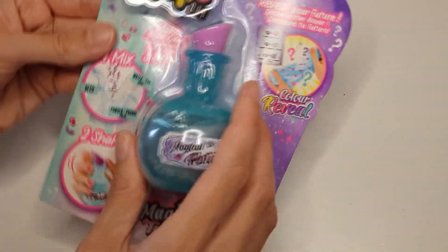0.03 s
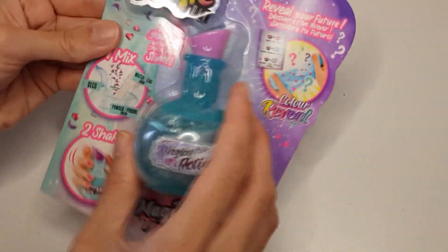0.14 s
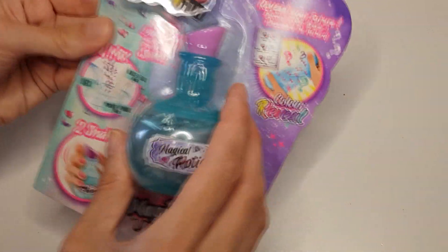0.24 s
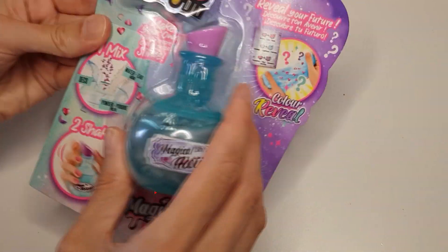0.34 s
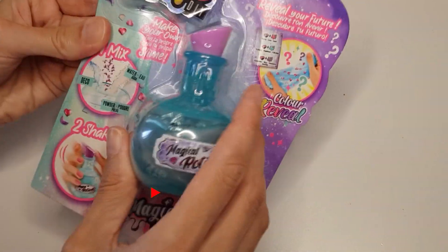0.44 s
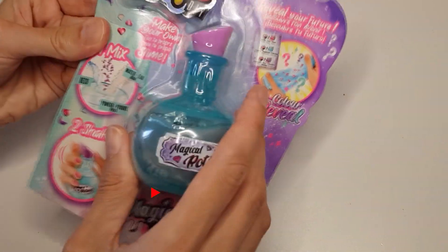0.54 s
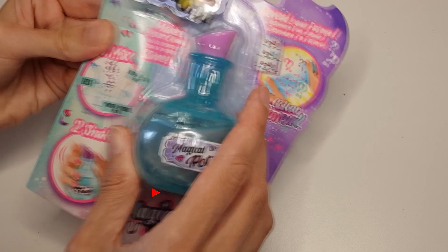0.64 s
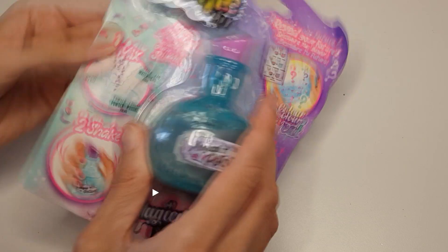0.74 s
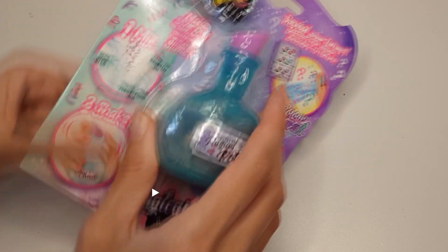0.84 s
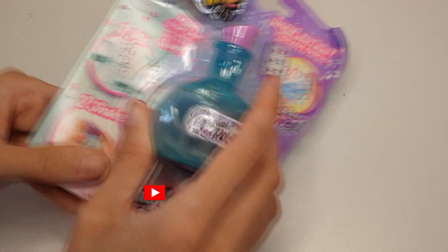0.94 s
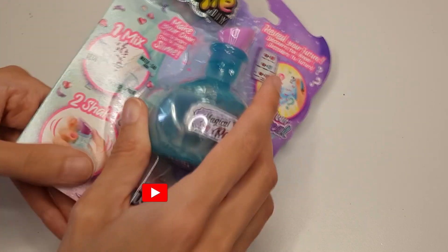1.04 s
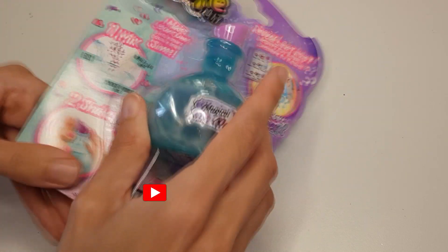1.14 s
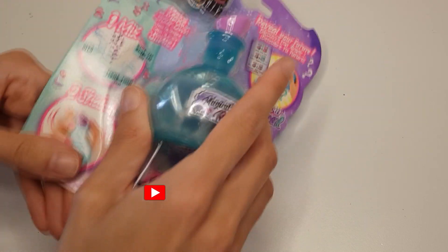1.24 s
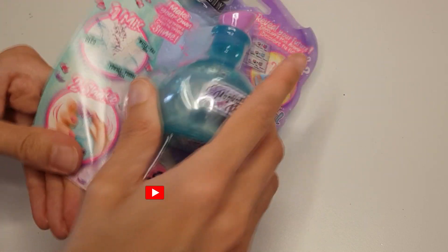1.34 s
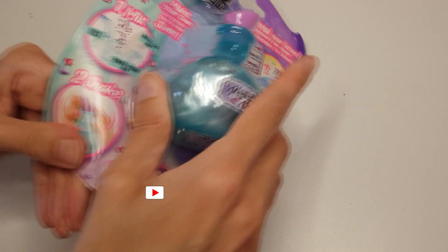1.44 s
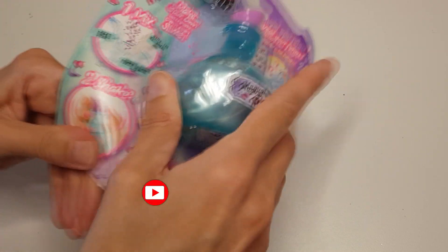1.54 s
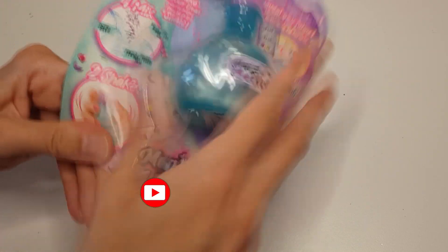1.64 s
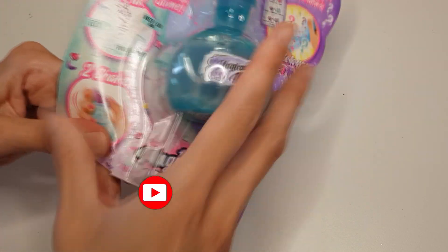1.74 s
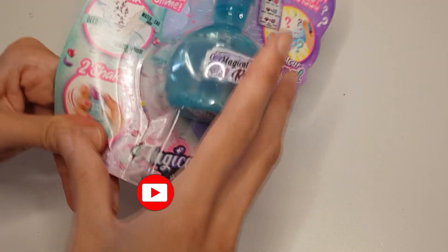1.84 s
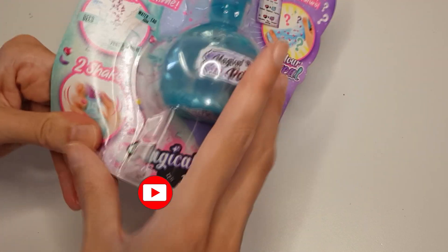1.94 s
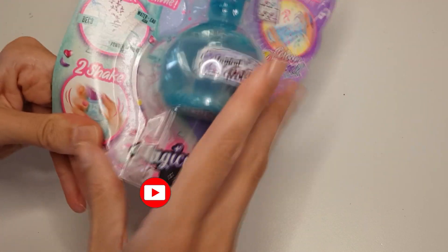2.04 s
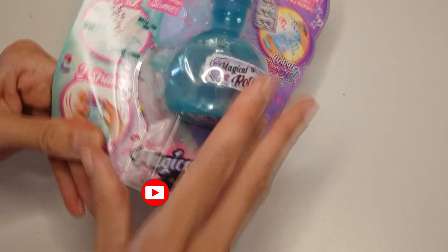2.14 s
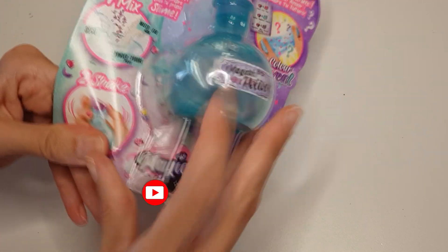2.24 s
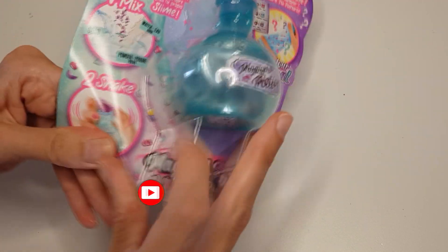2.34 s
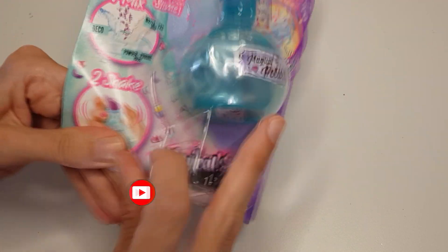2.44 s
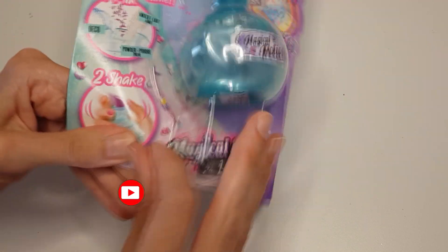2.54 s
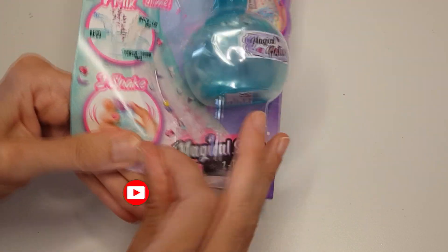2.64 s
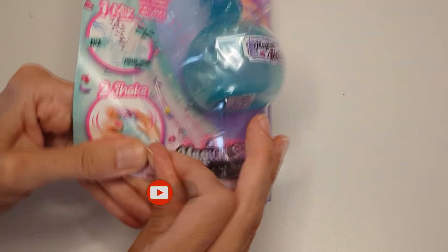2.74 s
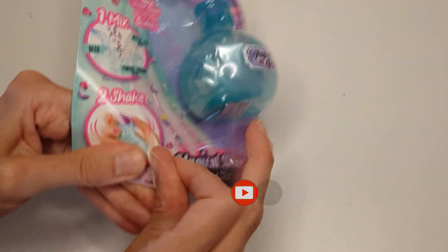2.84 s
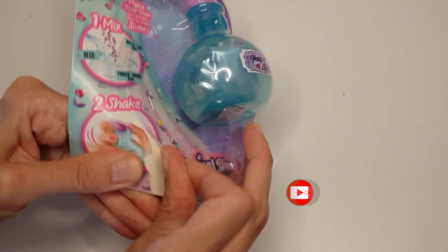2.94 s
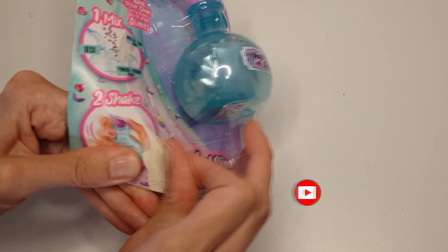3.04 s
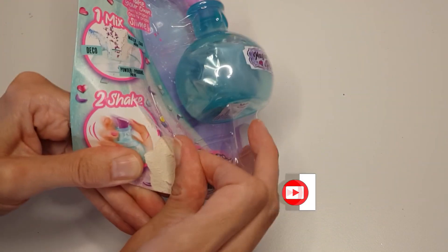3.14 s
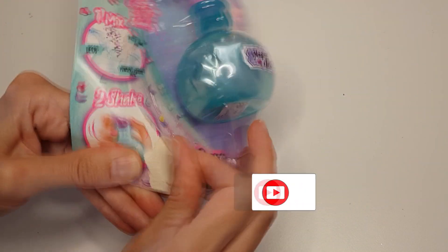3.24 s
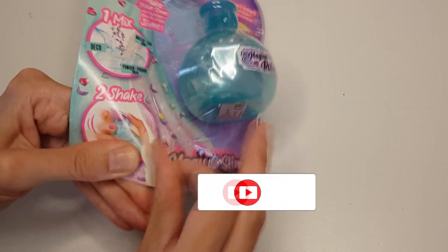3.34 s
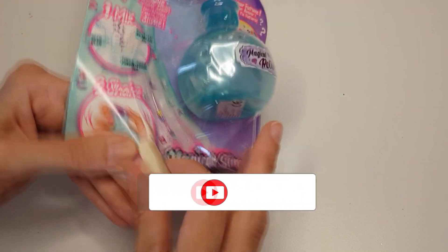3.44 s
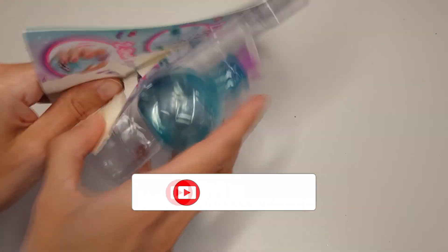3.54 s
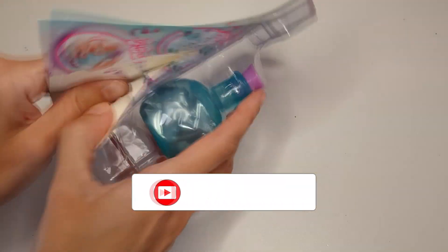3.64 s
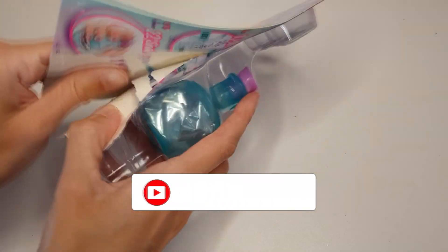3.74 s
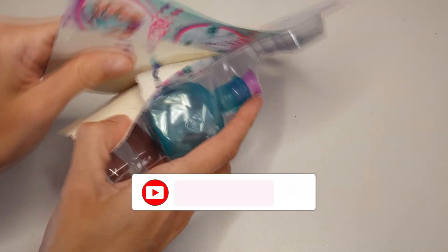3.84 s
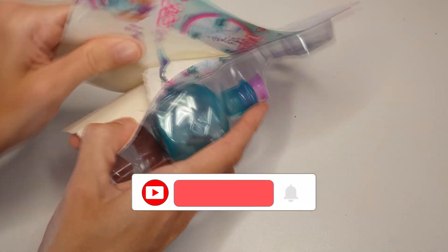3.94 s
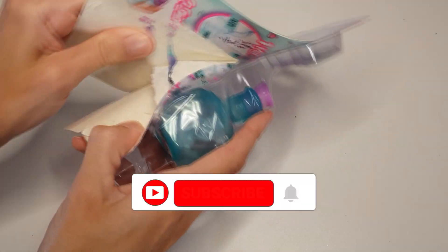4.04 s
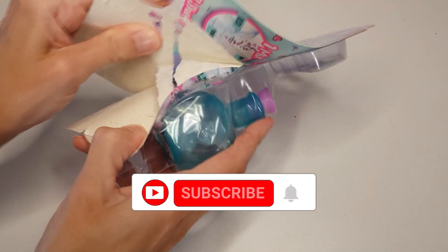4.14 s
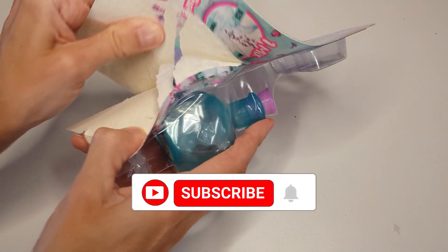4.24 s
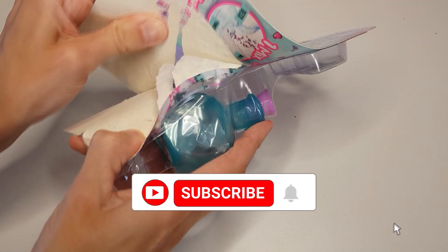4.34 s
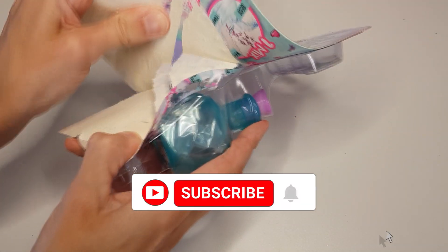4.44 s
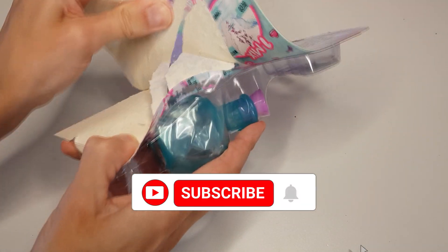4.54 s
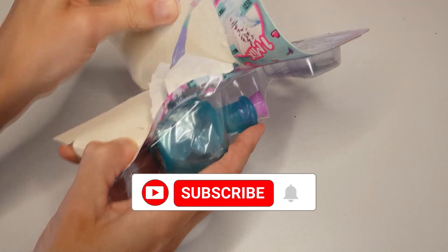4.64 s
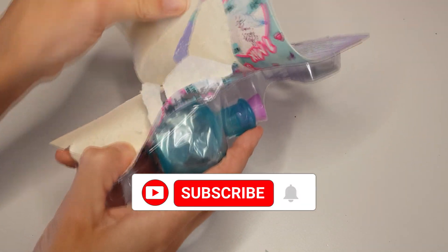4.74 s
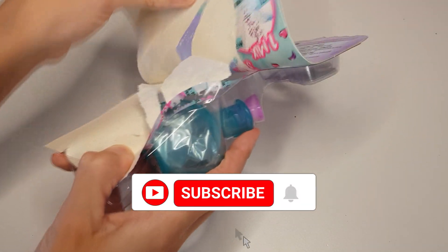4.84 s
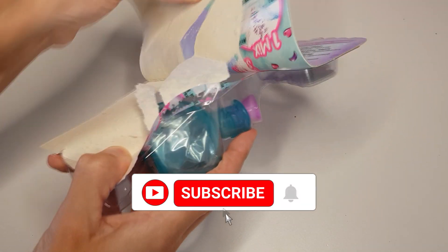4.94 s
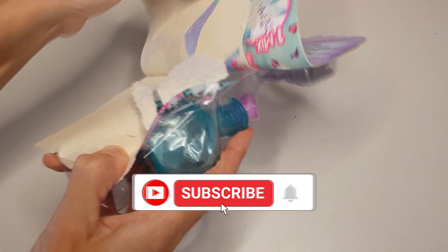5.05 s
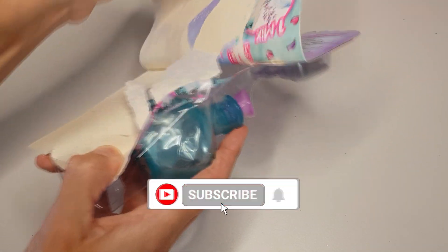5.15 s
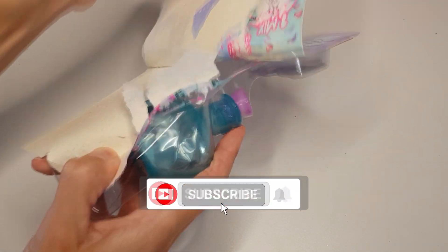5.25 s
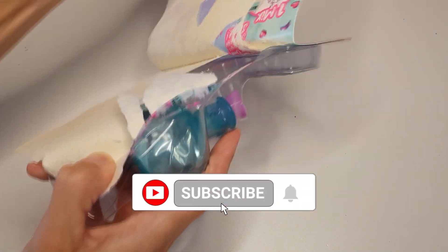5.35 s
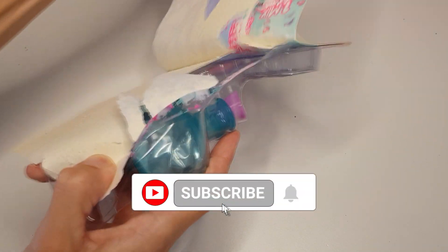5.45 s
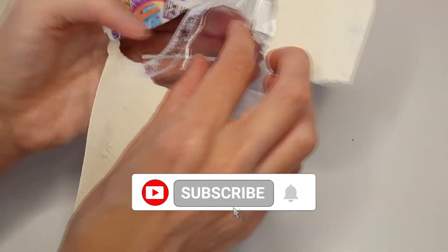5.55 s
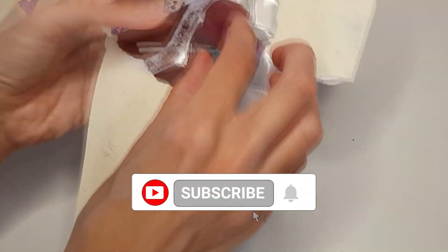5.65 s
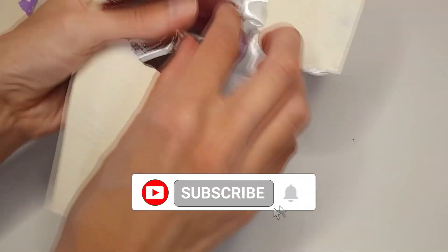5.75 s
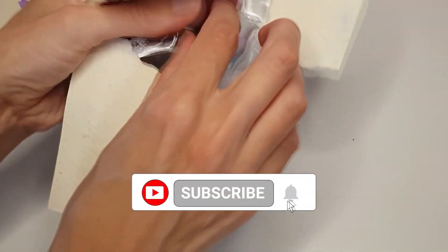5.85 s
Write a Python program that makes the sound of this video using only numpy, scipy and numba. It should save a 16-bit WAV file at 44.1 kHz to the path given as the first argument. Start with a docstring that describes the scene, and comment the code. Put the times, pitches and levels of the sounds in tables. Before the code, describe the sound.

Hands snap open a stiff plastic blister pack with dull pops, then rip off its card backing in one long, crackling tear.

```python
"""Sharp plastic snaps and dull pops, close up in a small room: hands are opening a blister pack over a table.
The stiff shell buckles and its dome flips over, while fingers rub and slide on it. The glued card backing
rips away in a flutter, crackle and fizz of breaking fibres: a few short tugs, then one long tear that
stops abruptly, and a little last handling."""
import sys
import numpy as np
from scipy import signal
from scipy.fft import rfft, irfft, next_fast_len
from scipy.io import wavfile
from scipy.ndimage import uniform_filter1d
from numba import njit

SR = 44100
rng = np.random.default_rng(int(sys.argv[2]) if len(sys.argv) > 2 else 0)


def inscribe(sig):
    """Save sig as 16-bit PCM at rate SR to the path in sys.argv[1].

    A 1-D sig is mono; a 2-D sig holds one channel per row.
    Samples are clipped to [-1, 1] before scaling.
    """
    pcm = np.round(np.clip(np.atleast_2d(sig).T, -1, 1) * 32767)
    wavfile.write(sys.argv[1], SR, pcm.astype(np.int16))


N = 259515
TIME = np.arange(N) / SR

# Tone of the still room. Each row: frequency in Hz, level in dB.
AIR_EQ = [(15, -32), (25, -2), (102, 0), (476, -18), (754, -28), (936, -22), (5280, -28), (8590, -33),
          (13200, -28), (16000, -31)]
# The room's ring. Each row: band centre in Hz, time to fade 60 dB in seconds, level in dB.
ROOM_BANDS = [(342, 0.4, -3), (886, 0.54, -8.5), (1900, 0.46, -9.5), (3480, 0.55, -9), (8000, 0.53, -10),
              (13100, 0.38, -7.5)]
# The pack bumps the table. Each row: start in seconds, level in dB.
TABLE_BUMPS = [(0.738, -49), (1.331, -55.5), (2.875, -46.5), (3.31, -59), (3.579, -57)]
# Resonances of the plastic shell. Each row: pitch in Hz, width in Hz, gain in dB.
SHELL_MODES = [(438, 197, 9), (845, 55, 3), (960, 230, -6.5), (1700, 360, -2), (2280, 33, -2.5),
               (3460, 340, -5), (4000, 190, 0), (4930, 800, -2.5), (11050, 1900, 8)]
# How the card radiates. Each row: frequency in Hz, gain in dB.
CARD_EQ = [(400, -52.5), (720, 2), (1120, -1), (1800, -0.5), (2500, -8.5), (3500, -9), (5000, -10.5),
           (6400, -14.5), (8000, -22), (11300, -11.5), (13500, -16), (15600, -17.5), (16500, -21)]
# The card flap's note moves as the hands bend and free it. Each row: time in seconds, pitch in Hz.
FLAP_PITCH = [(1.34, 1220), (1.59, 2280), (2.85, 1030), (3.27, 980), (3.42, 940), (3.65, 1700),
              (4.11, 1530), (4.22, 1115), (4.5, 1420), (4.82, 1230), (5.14, 1130), (5.37, 1140),
              (5.57, 1700), (5.68, 1180)]
# Fingers tighten on the hollow shell. Each row: start in seconds, length in seconds, level in dB.
FINGER_GRIPS = [(0.948, 0.1, -77), (2.21, 0.15, -73.5), (2.355, 0.07, -63.5), (2.498, 0.041, -68),
                (2.754, 0.073, -69), (2.863, 0.016, -46.5), (3.106, 0.11, -63.5), (3.22, 0.061, -53),
                (3.521, 0.089, -63), (3.796, 0.015, -59.5), (5.614, 0.46, -65.5)]
# Fingertips slide. Each row: start in seconds, length in seconds, level in dB, centre of the hiss in Hz.
FINGER_SLIDES = [(0.947, .07, -72, 5670), (1.093, 0.037, -72, 5500), (1.345, 0.0088, -47, 12500),
                 (1.877, 0.067, -76.5, 6600), (2.015, 0.064, -71.5, 6500), (2.118, 0.11, -72.5, 6400),
                 (2.23, 0.058, -74, 12100), (2.273, 0.17, -75.5, 3730), (2.363, 0.13, -72, 11600),
                 (2.575, 0.37, -64.5, 13200), (3.017, 0.078, -55, 13800), (3.09, 0.01, -53, 4930)]
# Close modes of the dome, beating as it rings on.
# Each row: pitch in Hz, level in dB, time to fade 60 dB in seconds.
DOME_PARTIALS = [(520, -14, 0.32), (651, -9, 0.21), (757, 0, 0.33), (840, -3.5, 0.41), (937, -6, 0.38),
                 (990, -1, 0.34), (1100, -10, 0.25), (1360, -21, 0.23)]
# The dome buckles. Each row: start in seconds, dome pitch in Hz, dome level in dB, rim pitch in Hz,
# rim level in dB, the dome's lag behind the rim in seconds, after-ring level in dB, room send in dB.
DOME_POPS = [(0.7501, 926, -20, 2200, -37.5, .0002, -60, -14),
             (0.7825, 865, -33, 2400, -43, 0.00028, -58, -8),
             (2.8755, 960, -26.5, 3560, -36, 0.00016, -58, -15),
             (2.8816, 906, -25, 3800, -19, 0.00045, -51, -7.5),
             (3.3125, 982, -11, 2635, -20, 0.00096, -38, -5.5)]
# Shell and glue snap. Each row: start in seconds, ring time in seconds, level in dB,
# strongest frequency in Hz, roll-off to either side in dB per octave.
SHELL_SNAPS = [(0.188, 0.0093, -54, 850, 16), (0.6947, 0.0079, -57.5, 600, 5.5),
               (0.7316, 0.004, -40, 940, 5.5), (0.737, 0.0034, -39, 940, 9), (0.7499, 0.004, -33.5, 870, 9),
               (0.934, 0.014, -50.5, 700, 12.5), (0.972, 0.018, -58.5, 900, 10),
               (1.011, 0.014, -51, 845, 10.5), (1.304, 0.0074, -54.5, 595, 12),
               (1.3358, 0.0015, -30, 11000, 12), (1.3367, 0.004, -33.5, 2200, 2),
               (1.511, 0.0069, -59.5, 2300, 6), (1.5861, 0.0025, -39.5, 2660, 7.5),
               (2.233, 0.0023, -64, 11000, 5), (2.323, 0.014, -64.5, 1700, 3),
               (2.39, 0.0079, -64, 900, 1.5), (2.407, 0.0067, -56.5, 11000, 9),
               (2.607, 0.007, -45.5, 12000, 35), (2.623, 0.0021, -39.5, 12000, 36),
               (2.669, .005, -53, 7000, 3.5), (2.7621, 0.003, -51, 11100, 8.5),
               (2.812, 0.0015, -52, 11000, 8), (2.8252, 0.012, -51, 11400, 5),
               (2.8546, 0.005, -41, 686, 13), (2.8652, 0.018, -44, 11000, 4.5),
               (2.882, 0.0042, -31.5, 1900, 8.5), (2.898, 0.0078, -38, 700, 18),
               (3.0176, 0.0036, -52.5, 11000, 3.5), (3.061, 0.008, -43, 11500, 6.5),
               (3.0721, 0.018, -45.5, 8000, 4.5), (3.16, .002, -59, 11000, 6),
               (3.2648, .008, -32.5, 1000, 14), (3.3127, 0.0029, -18, 1210, 16.5),
               (3.3711, 0.0036, -43, 3000, 3.5), (3.572, 0.003, -40.5, 1700, 3.5),
               (3.6123, 0.0035, -35, 2400, 7.5), (3.719, 0.0061, -43.5, 2630, 8.5),
               (3.7558, 0.0023, -33.5, 2680, 22), (3.777, 0.0033, -44, 1930, 8),
               (3.8494, 0.0071, -45, 2440, 8), (3.944, .002, -36, 3900, 14), (3.982, .002, -38, 3900, 22),
               (4.017, 0.0039, -44.5, 1900, 5.5), (4.058, 0.0026, -37.5, 7340, 11.5),
               (4.0859, 0.0021, -33, 2360, 8.5), (4.109, 0.0052, -48, 11000, 14),
               (4.135, 0.0018, -49, 1600, 19), (4.159, 0.0016, -49.5, 1500, 7),
               (4.319, 0.0024, -51, 1600, 5), (4.34, 0.0016, -45, 2500, 4), (4.451, 0.00092, -43, 4000, 13),
               (4.5096, 0.0015, -37.5, 2200, 4), (4.543, 0.0018, -44, 1900, 5),
               (4.6019, 0.0027, -31.5, 1530, 9.5), (4.622, 0.0023, -36.5, 4500, 17),
               (4.6348, 0.0029, -30, 1500, 14), (4.681, 0.0014, -33, 1810, 15), (4.695, .002, -42, 4500, 6),
               (4.763, .002, -41, 4500, 2), (4.768, .002, -36, 7000, 3), (4.7697, 0.0026, -23.5, 5800, 4.5),
               (4.7924, 0.011, -30.5, 1700, 13), (4.8387, 0.002, -31, 8000, 5),
               (4.8595, .004, -34.5, 1400, 13), (4.8729, 0.0036, -40, 2000, 5.5),
               (4.892, 0.0033, -40, 1500, 17), (4.912, 0.0012, -48.5, 4000, 2), (4.97, .0015, -50, 3000, 2),
               (5.037, 0.0077, -39, 2530, 6.5), (5.0607, 0.0012, -35, 10000, 3.5),
               (5.0984, 0.0038, -36, 2480, 3), (5.14, .005, -35, 1200, 12),
               (5.2417, 0.0094, -32.5, 1400, 3.5), (5.262, 0.0051, -28.5, 1900, 5.5),
               (5.286, .003, -41, 3800, 8), (5.347, .002, -52, 1400, 11), (5.419, 0.0046, -41.5, 1600, 17),
               (5.467, 0.0039, -37, 2000, 7), (5.478, 0.0043, -32, 1900, 11.5),
               (5.566, 0.0042, -39, 2000, 16), (5.5735, .001, -40.5, 12000, 19),
               (5.609, 0.0039, -42.5, 1600, 8), (5.642, 0.0027, -56, 2200, 4),
               (5.7173, 0.003, -46.5, 1700, 8), (5.726, 0.0098, -55, 4500, 6),
               (5.7547, 0.0061, -47, 600, 1)]
# Edges in Hz of a snap's four registers: thud, knock, crack and tick.
REGISTER_EDGES_HZ = [300, 1100, 3200, 7500, 16500]
# Short tugs at the card. Each row: start in seconds, length in seconds, level in dB,
# brightness in dB (fizz up, flutter down).
CARD_TUGS = [(0.741, 0.0067, -59, -0.5), (0.841, 0.0067, -66.5, 6.5), (.94, 0.077, -79, -3.5),
             (1.35, 0.11, -83, 11), (2.604, 0.093, -68.5, 5), (2.765, 0.031, -64.5, 6),
             (2.884, 0.031, -55.5, 2), (3.058, 0.041, -59.5, 8), (3.224, 0.056, -52, -9),
             (3.33, 0.026, -60, -7), (3.522, 0.025, -54.5, -3.5), (3.725, 0.023, -65.5, -9.5),
             (3.843, 0.0064, -55.5, -7), (3.92, 0.173, -57.5, -1.5), (5.246, 0.025, -42, 4),
             (5.446, 0.056, -60.5, 18), (5.454, 0.012, -51, -10), (5.585, 0.11, -62, -2.5),
             (5.72, 0.15, -66, -3.5), (5.848, 0.06, -51.5, -5)]
# The long pull that rips the card off. Each row: time in seconds, effort in dB.
PULL_EFFORT = [(3.98, -54.5), (4.15, -51), (4.25, -45.5), (4.32, -48.5), (4.48, -40.5), (4.54, -44),
               (4.62, -40.5), (4.8, -43), (4.98, -45.5), (5.02, -48.5), (5.05, -43), (5.13, -44.5),
               (5.225, -45.5), (5.28, -40.5), (5.4, -49), (5.44, -43.5), (5.48, -45), (5.54, -49),
               (5.585, -49)]

PULL_START_S, PULL_END_S, FULL_PULL_DB = 3.965, 5.592, -42
# Layers riding the long pull. Each pair: offset at full pull in dB, dB gained per dB of effort.
FLUTTER, CRACKLE, FIZZ, RUB, RUMBLE = (3.6, 1.4), (0.16, 1), (-0.87, 0.68), (-12.5, 2), (-22, 1)
ATTACK_S, BUILD_DB, RELEASE_S = 0.0058, 1.5, 0.019  # a hand catches quickly, builds up and lets go


def undb(db):
    """Decibels to gain."""
    return 10 ** (np.asarray(db) / 20)


def unit(x):
    """Scale to rms 1."""
    return x / np.sqrt(np.mean(x ** 2))


def steady(x, window=2400):
    """Ride the level over some hundredths of a second, keeping the grain."""
    return x / np.sqrt(uniform_filter1d(x ** 2, window) + 0.0011 * np.mean(x ** 2))


def curve(points):
    """Automation lane: straight lines through (seconds, value) points."""
    return np.interp(TIME, *np.transpose(points))


def walk(rate):
    """Random drift: a straight glide to a new value, rate times a second; spread near 1."""
    hold = int(SR / rate)
    steps = np.repeat(rng.standard_normal(N // hold + 1), hold)
    return 1.17 * uniform_filter1d(steps, hold)[:N]


def band(x, lo_hz, hi_hz, order=3):
    """Causal band-pass."""
    sos = signal.butter(order, [lo_hz, min(hi_hz, .45 * SR)], "band", fs=SR, output="sos")
    return signal.sosfilt(sos, x + 1e-18)


def colour(x, points):
    """Equalise a sound through (Hz, dB) points."""
    hz, db = np.transpose(points)
    size = next_fast_len(len(x), real=True)
    bin_hz = np.maximum(np.arange(size // 2 + 1) * SR / size, 1)
    gain = undb(np.interp(np.log(bin_hz), np.log(hz), db))
    return irfft(rfft(x, size) * gain, size)[:len(x)]


@njit
def resonate(x, hz, width_hz):
    """State-variable band-pass whose centre moves; gain 1 at the centre."""
    out, band_state, low_state = np.empty(len(x)), 0., 0.
    for i in range(len(x)):
        tuning, damping = np.tan(np.pi * hz[i] / SR), width_hz / hz[i]
        passed = (band_state + tuning * (x[i] - low_state)) / (1 + tuning * (tuning + damping))
        band_state = 2 * passed - band_state
        low_state += 2 * tuning * passed
        out[i] = damping * passed
    return out


def breaks(rate, spread_db, cap_db=0):
    """Tiny random fractures or slips, rate a second; a few stand out, or sink if spread_db is negative."""
    out = np.zeros(N)
    at = np.flatnonzero(rng.random(N) < rate / SR)
    size_db = np.minimum(spread_db * rng.exponential(size=N)[at], cap_db)
    out[at] = undb(size_db) * rng.choice([-1, 1], N)[at]
    return out


def stroke(start, length):
    """Envelope of one stroke of a hand: attack, build-up, release."""
    age = np.maximum(TIME - start, 0)
    build = undb(BUILD_DB * (np.minimum(age / length, 1) + 1.5))
    release = np.exp(-np.maximum(age - length, 0) / RELEASE_S)
    return np.minimum(age / ATTACK_S, 1) * build * release


def pull(layer):
    """Gain of a layer that follows the effort of the long pull."""
    offset_db, slope = layer
    gate = np.clip(np.minimum(TIME - PULL_START_S, PULL_END_S - TIME) / ATTACK_S, 0, 1)
    return gate * undb(FULL_PULL_DB + offset_db + slope * (curve(PULL_EFFORT) - FULL_PULL_DB))


def air(level_db=-67.8, drift_db=.7):
    """Low rumble and faint hiss of the still room."""
    return undb(level_db + drift_db * walk(5)) * unit(colour(rng.standard_normal(N), AIR_EQ))


def room(x, onset_s=0.0025):
    """Reflections from table and walls build up quickly and fade in about half a second."""
    t = np.arange(SR // 2) / SR
    centres = np.array(ROOM_BANDS)[:, 0]
    edges = [60, *np.sqrt(centres[1:] * centres[:-1]), 18000]
    response = 0
    for (_, t60, db), lo, hi in zip(ROOM_BANDS, edges, edges[1:]):
        fade = undb(-60 * t / t60) * (1 - np.exp(-(t / onset_s) ** 2))
        reflections = band(rng.standard_normal(len(t)), lo, hi)
        response = response + undb(db) * reflections * fade / np.linalg.norm(fade)
    return signal.oaconvolve(x, response)[:N]


def table_rumble(trim_db=-3, decay_s=0.048):
    """The table top rumbles softly when the pack bumps it and while the hands strain."""
    bumps = sum(undb(db) * (TIME > s) * np.exp(-np.abs(TIME - s) / decay_s) for s, db in TABLE_BUMPS)
    rumble = unit(band(breaks(rate=770, spread_db=11.5, cap_db=16), 51, 186, order=2))
    return rumble * (pull(RUMBLE) + bumps) * undb(trim_db)


def shell(x, direct_db=-3, detune=1):
    """A push on the pack is heard directly and through its resonances."""
    out = undb(direct_db) * x
    for hz, width, db in SHELL_MODES:
        out = out + undb(db) * signal.lfilter(*signal.iirpeak(hz * detune, hz / width, fs=SR), x)
    return out


def squeak(start_s=2.113, first_hz=2150, level_db=-61, octaves_per_s=32, decay_s=0.012):
    """Skin chatters on the plastic and slows down: a faint, rough rub that falls an octave."""
    age = np.maximum(TIME - start_s, 0)
    hz = first_hz * np.maximum(2 ** (-octaves_per_s * age), .5)
    fade = np.minimum(age / ATTACK_S, 1) * np.exp(-age / decay_s)
    return undb(level_db) * fade * unit(resonate(rng.standard_normal(N), hz, width_hz=260.))


def slides(edge_ratio=1.485):
    """Fingertips glide over the pack: dense tiny slips, radiated by the card, make a soft hiss."""
    slips = colour(breaks(rate=2700, spread_db=-1), CARD_EQ)
    out = np.zeros(N)
    for s, length, db, hz in FINGER_SLIDES:
        hiss = unit(band(slips, hz / edge_ratio, hz * edge_ratio, order=2))
        out += undb(db) * stroke(s, length) * hiss
    return out


def finger_rub(trim_db=-3, scuff_db=-10):
    """Skin sticks and slips on the hollow pack, at each new grip and all through the long pull."""
    drag = pull(RUB) + sum(undb(db) * stroke(s, length) for s, length, db in FINGER_GRIPS)
    slips = shell(breaks(rate=900, spread_db=4, cap_db=8.5))
    body = steady(band(slips, 290, 715))
    scuff = undb(scuff_db) * steady(band(slips, 790, 1320))
    return (body + scuff) * drag * undb(trim_db)


def dome_ring(t, waver=0.0255):
    """The dome's modes die away, wavering in pitch as the hands keep bending it."""
    out = 0
    for hz, db, t60 in DOME_PARTIALS:
        cycles = rng.random() + np.cumsum(hz * (1 + waver * walk(71.7)[:len(t)])) / SR
        out = out + undb(db - 60 * t / t60) * np.sin(2 * np.pi * cycles)
    return out * np.minimum(t / ATTACK_S, 1)


def wave_packet(t, hz, crest_s, fall=0.26):
    """A packet of bending waves swells and dies, falling in pitch through hz at its crest."""
    age = np.maximum(t, 0) / crest_s
    swell = (age * np.exp(1 - age)) ** 2
    pitch = hz * np.exp(-fall * np.tanh(age - 1))
    return swell * np.sin(2 * np.pi * np.cumsum(pitch) / SR)


def pops(shell_db=-17):
    """The dome flips: a quick high packet, a slower low one, then a ring. Gives direct and room send."""
    out = np.zeros((2, N + SR))
    t = np.arange(SR // 2) / SR
    for s, dome_hz, dome_db, rim_hz, rim_db, lag_s, ring_db, send_db in DOME_POPS:
        rim = undb(rim_db) * wave_packet(t, rim_hz, crest_s=.0008)
        dome = undb(dome_db) * wave_packet(t - lag_s, dome_hz, crest_s=.001)
        pop = rim + dome
        pop += undb(shell_db) * band(shell(pop, direct_db=-21), 620, 9000, order=2)
        start = int(s * SR)
        out[:, start:start + len(t)] += [pop + undb(ring_db) * dome_ring(t), undb(send_db) * pop]
    return out[:, :N]


def smooth_power(spectrum, width_hz):
    """Power of a spectrum, averaged over neighbouring frequencies."""
    size = 2 * (len(spectrum) - 1)
    return np.abs(uniform_filter1d(np.abs(spectrum) ** 2, int(width_hz * size / SR) + 1)) + 1e-18


def burst(fade):
    """Scattered bending waves under an envelope; they carry all pitches about equally."""
    spectrum = rfft(rng.standard_normal(len(fade)) * fade, 2 * len(fade))
    return irfft(spectrum / np.sqrt(smooth_power(spectrum, width_hz=700)))[:len(fade)]


def diffuse(x):
    """The room hears a snap from every side of the pack, so its narrow peaks and notches even out."""
    spectrum = rfft(x, 2 * len(x))
    gain = np.sqrt(smooth_power(spectrum, width_hz=1100) / (np.abs(spectrum) ** 2 + 1e-18))
    return band(irfft(spectrum * gain)[:len(x)], 456, 18000, order=2)


def snaps(kick=0.6, kick_s=0.0011, bend=.05):
    """The plastic gives: a kick, then bending waves die in milliseconds. Gives direct and room send."""
    out = np.zeros((2, N + SR))
    t = np.arange(SR // 16) / SR
    low_cut = signal.butter(2, 780, "high", fs=SR, output="sos")  # the shell is too small to radiate bass
    flap_hz = curve(FLAP_PITCH)
    lows, highs = REGISTER_EDGES_HZ[:-1], REGISTER_EDGES_HZ[1:]
    register_hz = np.sqrt(np.multiply(lows, highs))
    for s, ring_s, peak_db, peak_hz, roll_off in SHELL_SNAPS:
        start = int(s * SR)
        waves = burst(np.exp(-t / max(ring_s, 1e-3)) + kick * np.exp(-t / kick_s))
        detune = np.exp(bend * rng.standard_normal())  # bending retunes the shell from snap to snap
        plastic = signal.sosfilt(low_cut, shell(waves, direct_db=-8.5, detune=detune))
        hollow_flap = 1.3 * resonate(plastic, np.full(len(t), flap_hz[start]), width_hz=250.)
        levels_db = peak_db - roll_off * np.abs(np.log2(register_hz / peak_hz))
        snap = 0
        for lo, hi, db in zip(lows, highs, levels_db):
            register = band(plastic + hollow_flap, lo, hi, order=5 if lo > lows[0] else 3)
            attack_rms = np.sqrt(np.mean(register[:SR // 100] ** 2))
            snap = snap + undb(db) * register / attack_rms
        out[:, start:start + len(t)] += [snap, diffuse(snap)]
    return out[:, :N]


def rasps(per_s=48, low_hz=1150, high_hz=5000, decay_s=0.0061, edge_ratio=1.23):
    """Strips of the card's top layer let go one by one; each rasps at the pitch of its own length."""
    out = np.zeros(N + SR)
    t = np.arange(SR // 30) / SR
    effort = pull(CRACKLE)
    pull_s = PULL_END_S - PULL_START_S
    for when, pitch in rng.random((int(per_s * pull_s), 2)):
        start = int((PULL_START_S + when * pull_s) * SR)
        hz = low_hz * (high_hz / low_hz) ** pitch
        scratch = rng.standard_normal(len(t)) * np.exp(-t / decay_s)
        grain = band(scratch, hz / edge_ratio, hz * edge_ratio, order=2)
        attack_rms = np.sqrt(np.mean(grain[:SR // 200] ** 2))
        out[start:start + len(t)] += effort[start] * grain / attack_rms
    return out[:N]


def card(fractures, ring_s, scatter=1.0, paths=9):
    """Each fracture takes one of several paths through the card and echoes between its edges."""
    t = np.arange(SR // 50) / SR
    out = fractures
    for path in range(paths):
        echo = rng.standard_normal(len(t)) * np.exp(-t / ring_s)
        on_path = fractures * (np.arange(N) % paths == path)
        out = out + scatter * signal.oaconvolve(on_path, echo / np.linalg.norm(echo))[:N]
    return colour(out, CARD_EQ)


def flex(x, hz, width_hz, wander, boost_db, bends_per_s=22):
    """A resonance of the bending card wanders about its centre by a share of it."""
    centre = hz * np.exp(np.clip(wander * walk(bends_per_s), -.6, .6))
    return x + undb(boost_db) * resonate(x, centre, float(width_hz))


def tear_gains():
    """Envelopes of flutter, crackle and fizz: the long pull plus the short tugs."""
    gains = np.array([pull(FLUTTER), pull(CRACKLE), pull(FIZZ)])
    for s, length, db, bright in CARD_TUGS:
        tug = np.outer(undb([db - bright, db, db + bright]), stroke(s, length))
        gains = np.hypot(gains, tug)
    return gains


def tear(flutter_db=-1, crackle_db=-1, free_run_db=-39, jerk_db=2.7, lurch_db=1.8):
    """Fibre bundles give way in jerks and flap the card; glue spots crack; single fibres fizz on top."""
    flutter_gain, crackle_gain, fizz_gain = tear_gains()
    pace = np.clip(flutter_gain / undb(free_run_db), 0.26, 1)  # a slow peel crackles, a fast one hisses
    jerk = undb(jerk_db * walk(170) + lurch_db * walk(60))  # the tear front sticks and slips
    bundles = unit(breaks(rate=1200 * pace, spread_db=1, cap_db=13))
    glue = unit(breaks(rate=2200 * pace, spread_db=-1.5))
    fibres = unit(breaks(rate=6000 * pace, spread_db=2, cap_db=40))
    tough_strands = .55 * unit(breaks(rate=110, spread_db=4, cap_db=12))

    flutter = card(jerk * bundles, ring_s=0.0099, scatter=0.69)
    flutter = flex(flutter, curve(FLAP_PITCH), width_hz=210, wander=.08, boost_db=8.5)
    crackle = card(jerk * (glue + .5 * bundles) + tough_strands, ring_s=0.0046)
    crackle = shell(crackle, direct_db=8)  # the glue sits on the plastic and rings it too
    crackle = flex(crackle, hz=3900, width_hz=150, wander=0.094, boost_db=2)
    fizz = card(jerk * (fibres + .5 * bundles) + tough_strands, ring_s=0.0017)
    return (steady(band(flutter, 755, 2400, order=4)) * flutter_gain * undb(flutter_db)
            + steady(band(crackle, 2550, 5800)) * crackle_gain * undb(crackle_db)
            + steady(band(fizz, 6750, 17600)) * fizz_gain)


def scene():
    """The pack in the hands, in its room; just as the long pull ends the scene changes: the sound and the
    room's ring break off at once, and a little last handling follows."""
    snapped, snap_send = snaps()
    popped, pop_send = pops()
    handling = tear() + rasps() + finger_rub() + slides() + squeak()
    send = handling + snap_send + pop_send
    gate = np.clip((PULL_END_S - TIME) / .002, 0, 1)  # shuts as the long pull ends
    gated_ring = gate * room(send * gate)
    late_ring = room(send * (1 - gate))
    return (snapped + popped + handling + gated_ring + late_ring + table_rumble() + air())[None]


def record(dry, top_hz=16450):
    """A steep low-pass takes off the very top."""
    return signal.sosfilt(signal.ellip(10, .2, 70, top_hz, fs=SR, output="sos"), dry)


dry = scene()
out = record(dry)
inscribe(out)
```